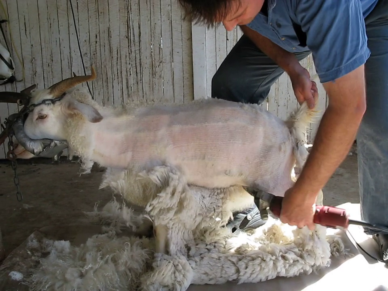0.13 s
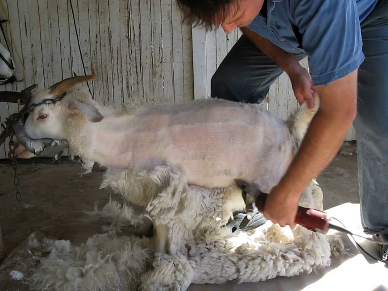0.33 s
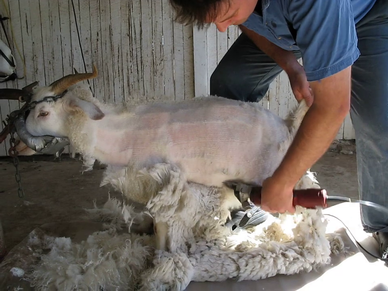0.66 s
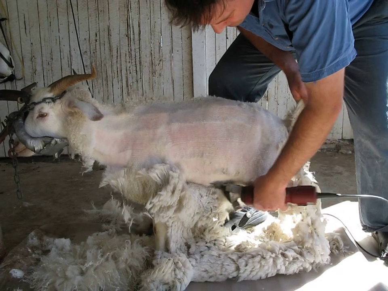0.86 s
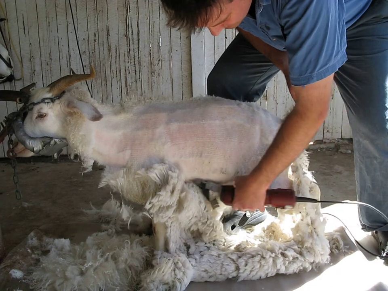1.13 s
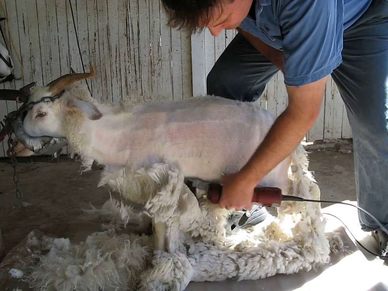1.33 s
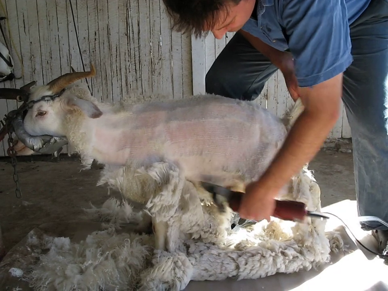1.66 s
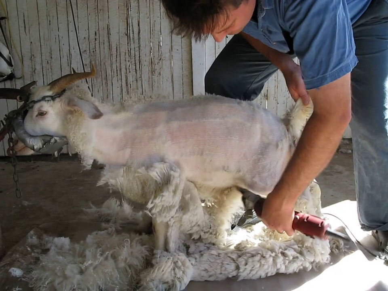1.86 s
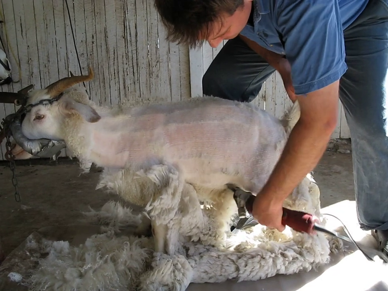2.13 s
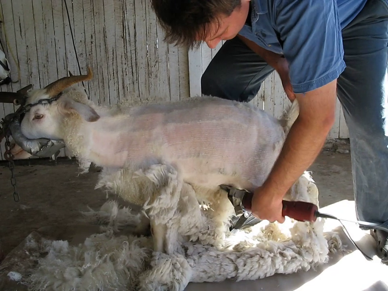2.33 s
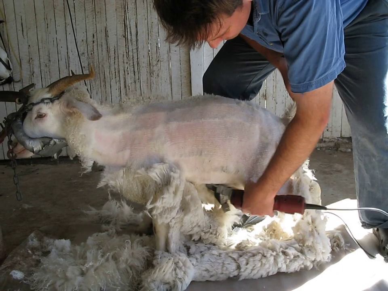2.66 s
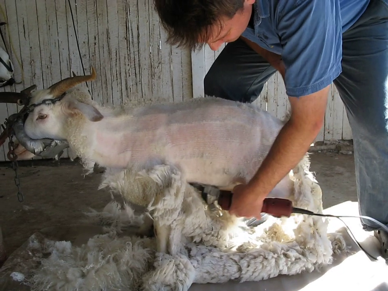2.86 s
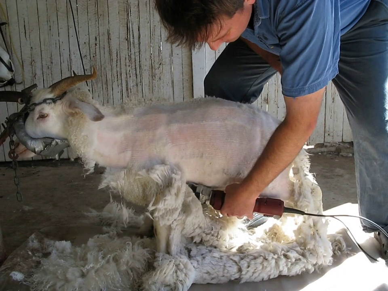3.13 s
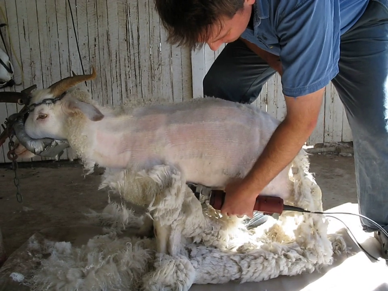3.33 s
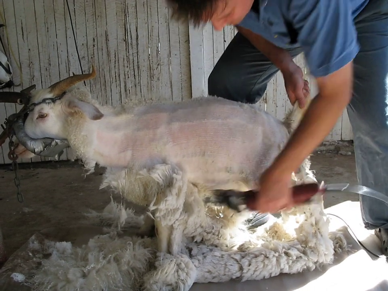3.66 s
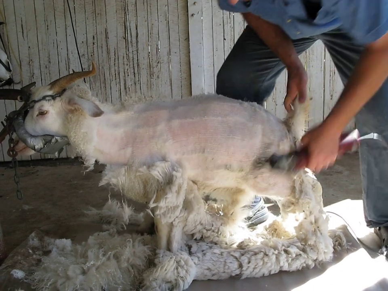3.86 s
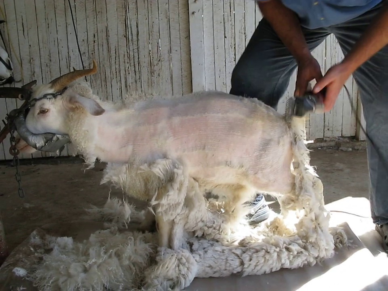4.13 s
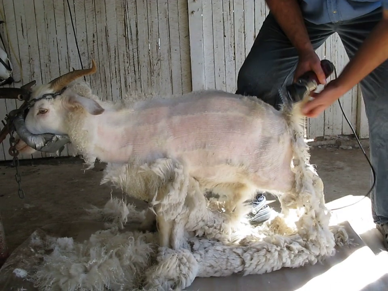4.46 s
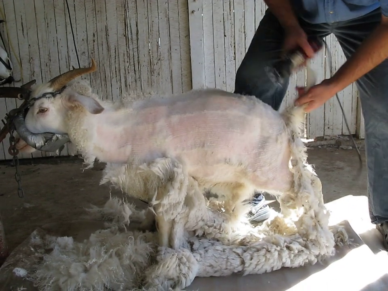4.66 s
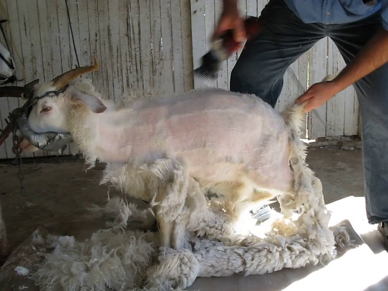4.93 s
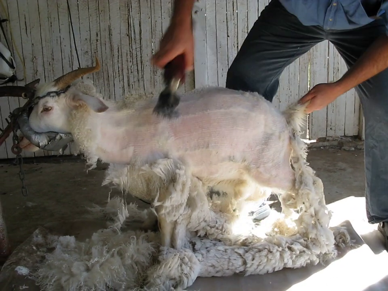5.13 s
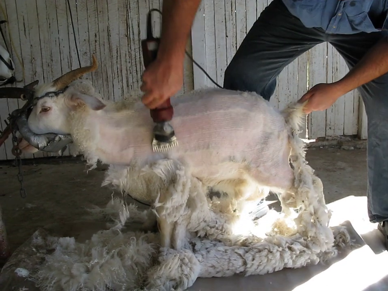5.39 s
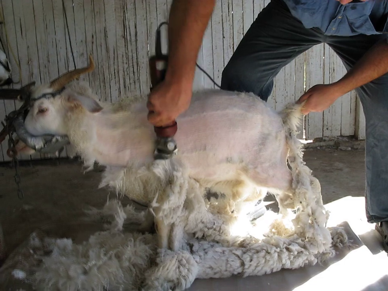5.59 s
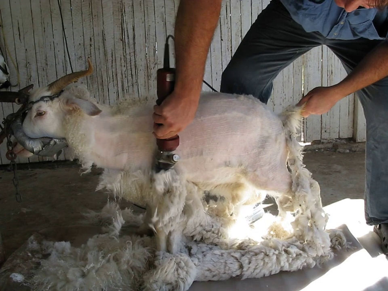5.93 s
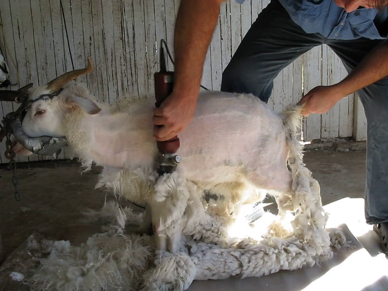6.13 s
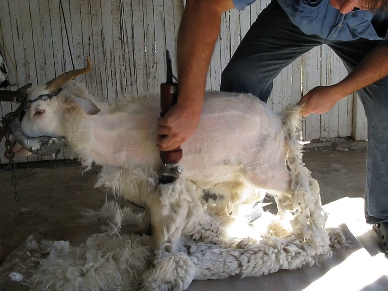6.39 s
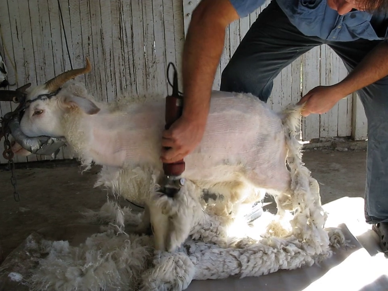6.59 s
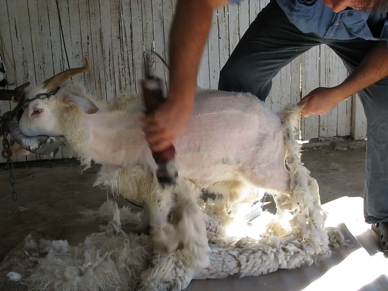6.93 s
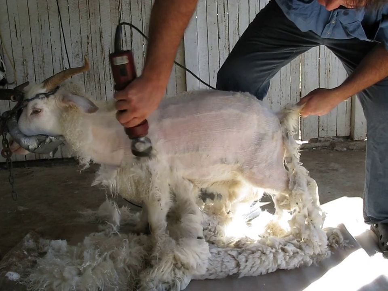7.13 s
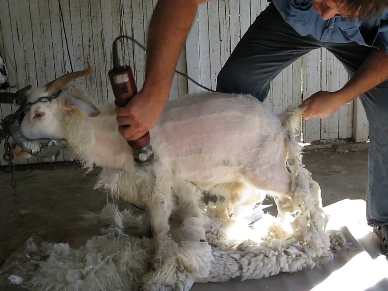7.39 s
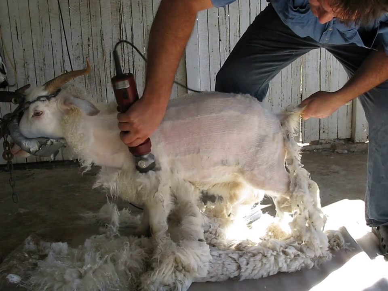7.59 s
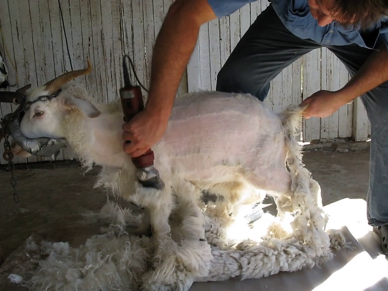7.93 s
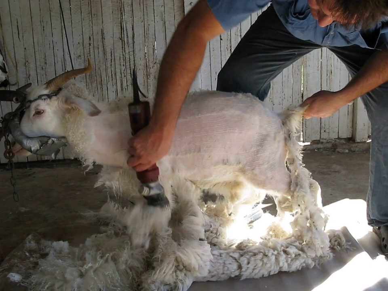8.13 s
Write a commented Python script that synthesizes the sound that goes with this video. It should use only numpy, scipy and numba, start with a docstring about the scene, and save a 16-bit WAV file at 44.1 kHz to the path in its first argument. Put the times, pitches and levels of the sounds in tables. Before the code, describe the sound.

Close, mono buzz of electric clippers cutting a goat's fleece, never stopping. Rapid cutter knocks fuse into a rough rattle under a high gear whine, with dry hair crackle and hissing fan air. The early belly cuts bring ringing colours; a mid-way lift makes it more open, with quick sweeps; later shoulder strokes sound denser and then brighter. Little bass, a slight shed echo, and soft low bumps far underneath.

```python
"""In a wooden shed, an electric shearing handpiece runs without a pause, cutting the fleece of a goat.
A geared motor whines as a sum of tones locked to its crank, over chattering tooth contacts.
The cutter knocks at both ends of every stroke and rebounds in between; hairs crackle and fan air hisses.
Hollows between tool, animal and floor ring as gliding resonances while the hand moves.
Decaying noise echoes stand for the plank walls; filtered noise gives a faint rumble and soft floor bumps."""
import sys
import numpy as np
from scipy import signal
from scipy.fft import rfft, irfft
from scipy.io import wavfile
from scipy.ndimage import uniform_filter1d
from numba import njit

SR = 44100
rng = np.random.default_rng(int(sys.argv[2]) if len(sys.argv) > 2 else 0)


def store_pcm(level_fs):
    """Save levels as 16-bit WAV."""
    pcm = np.round(np.clip(level_fs, -1, 1) * 32767).astype(np.int16)
    wavfile.write(sys.argv[1], SR, np.atleast_2d(pcm).T)


N = 364266


def undb(db):
    """Level law: decibels become an amplitude gain."""
    return 10 ** (np.asarray(db) / 20)


def unit(x):
    """Normalisation: scale to an rms of 1."""
    return x / np.sqrt(np.mean(x ** 2))


def colour(x, points):
    """Zero-phase equalisation: gains in dB interpolated over log frequency."""
    hz, db = np.transpose(points)
    f = np.maximum(np.fft.rfftfreq(N, 1 / SR), 1)
    gain = undb(np.interp(np.log(f), np.log(hz), db))
    return irfft(rfft(x) * gain, N)


def below(x, hz, order=4):
    """Zero-phase low-pass: subtracting it from the input leaves the matching high-pass."""
    sos = signal.butter(order, min(hz, SR / 2 - 1), fs=SR, output="sos")
    return signal.sosfiltfilt(sos, x, padtype="even")


@njit
def resonate(x, hz, width):
    """State-variable resonator: a band-pass with a moving centre and gain 1 at its peak."""
    y, band, low = np.empty(len(x)), 0., 0.
    for i in range(len(x)):
        g = np.tan(np.pi * hz[i] / SR)
        damping = np.pi * width / SR * (g + 1 / g)
        v = (band + g * (x[i] - low)) / (1 + g * (g + damping))
        band, low = 2 * v - band, low + 2 * g * v
        y[i] = damping * v
    return y


def fixed_resonance(x, hz, width_hz):
    """Simple resonance: one mode that holds its pitch."""
    return resonate(x, np.full(N, float(hz)), float(width_hz))


def walk(rate):
    """Random modulation: smoothed random steps, rate per second, scaled to rms 1."""
    k = int(SR / rate)
    steps = np.repeat(rng.standard_normal(N // k + 1), k)
    return unit(uniform_filter1d(steps, k)[:N])


def drift(sounds, rate):
    """Constant-power mixing: blend at random between alike sounds."""
    weights = np.array([walk(rate) for _ in sounds])
    return np.sum(weights * sounds, axis=0) / np.linalg.norm(weights, axis=0)


def fade(x, ms):
    """Exponential decay: each impulse gets a tail with this time constant."""
    return signal.lfilter([1], [1, -np.exp(-1000 / (ms * SR))], x)


def clicks(at, size):
    """Band-limited impulses: short sinc pulses at fractional sample positions."""
    taps = np.floor(at)[:, None] + np.arange(-3, 5)
    inside = (taps >= 0) & (taps < N)
    shape = size[:, None] * np.sinc(taps - at[:, None])
    return np.bincount(taps[inside].astype(int), shape[inside], N)


def ramp(start, length):
    """Linear transition: a straight rise from 0 to 1, times in s."""
    return np.clip((np.arange(N) / SR - start) / length, 0, 1)


def passing_band(x, start, end, first_hz, last_hz, width_hz):
    """Time-windowed resonance: a gliding band of the sound that fades in and out."""
    part, out = slice(max(int(start * SR), 0), int(end * SR)), np.zeros(N)
    n = len(x[part])
    glide_hz = np.linspace(first_hz, last_hz, n)
    out[part] = signal.windows.tukey(n, .4) * resonate(x[part], glide_hz, float(width_hz))
    return out


# spectrum of the still air of the shed, before scaling to the overall level
# columns: frequency_hz, relative_level_db
SHED_AIR = [(20, -1), (40, 5), (80, 3.5), (160, 5.5), (300, 9.5), (500, -49), (1500, -77)]
# soft bumps of feet and animal on the floor
# columns: centre_s, length_s (full width at 1/e), peak_rms_level_db, cutoff_hz
BUMPS = [(0.34, .11, -58, 59.6), (0.624, .1, -61, 55), (0.758, .1, -64, 60), (1.08, .14, -60, 70),
         (1.22, 0.086, -53, 85), (1.42, 0.28, -69, 60), (3.023, .014, -58, 250), (3.1, .14, -62, 55),
         (6.2, .016, -62, 220), (7.075, .012, -52, 600)]


def floor(air_db=-68):
    """Filtered noise: a faint rumble of the shed, and floor bumps with bell-shaped envelopes."""
    t = np.arange(N) / SR
    out = undb(air_db) * unit(colour(rng.standard_normal(N), SHED_AIR))
    for centre, length, db, top_hz in BUMPS:
        envelope = np.exp(-(2 * (t - centre) / length) ** 2)
        thud = unit(below(rng.standard_normal(N), top_hz, order=2))
        out = out + undb(db) * envelope * thud
    return out


def echoes(x, t60, gap_s, rate, count=4):
    """Diffuse reverberation: decaying noise responses, blended as the paths change with the tool."""
    t = np.arange(SR // 3) / SR
    tails = rng.standard_normal((count, len(t))) * undb(-60 * t / t60) * (t > gap_s)
    wet = [signal.fftconvolve(x, tail / np.linalg.norm(tail))[:N] for tail in tails]
    return drift(wet, rate)


def shed(x, near_db=-15.5, far_db=-6):
    """Early and late reflection: arm, flank and floor answer at once, then walls dulled by fleece."""
    near = echoes(x, t60=0.013, gap_s=.0007, rate=4)
    far = echoes(x, t60=0.39, gap_s=.008, rate=5)
    far = colour(far, [(2000, -0.5), (4500, -4.5), (12000, -4.0)])
    return x + undb(near_db) * near + undb(far_db) * far


# pushes through the fleece, and the resonance of the hollow under the comb
# columns: start_s, end_s, pressure (0-1), depth (0-1), first_pitch_hz, last_pitch_hz, width_hz,
# level_db (of the ring before its skirt is taken off)
CUTS = [(-0.3, 0.85, 0.27, 0, 2080, 2040, 200, -15), (0.66, 1.68, 0.4, 0.76, 2580, 2600, 280, 4.6),
        (1.5, 2.6, 0.2, 0, 2050, 2150, 277, -14), (2.278, 3.946, 0.36, 0.75, 2700, 2970, 420, 1.8),
        (5.104, 6.1, 0.2, 0, 1180, 1230, 277, -3), (5.824, 6.934, 0.96, 0, 1790, 1880, 277, 1),
        (7.582, 8.6, 0.6, 0, 6330, 6050, 800, -4)]
PRESS_S, SINK_S, LIFT_S = 0.21, 0.34, 0.17
# the tool, flat under the belly at first, is stood up at the shoulder
TURN_S, TURN_LENGTH_S, UPRIGHT_SHARE = 5.18, 0.4, 0.95


def push(start, end, attack_s):
    """Load envelope of one cut: bear down, hold, lift off."""
    return ramp(start, attack_s) * (1 - ramp(end - LIFT_S, LIFT_S))


def hand():
    """Boundary conditions: how upright the tool stands, its pressure, and its depth in the fleece."""
    upright = UPRIGHT_SHARE * ramp(TURN_S, TURN_LENGTH_S)
    pressure = np.max([hard * push(start, end, PRESS_S) for start, end, hard, *_ in CUTS], axis=0)
    depth = np.max([deep * push(start, end, SINK_S) for start, end, _, deep, *_ in CUTS], axis=0)
    return upright, pressure, depth


# bands weakened by reflections from belly, leg and hand
# columns: start_s, end_s, centre_hz, width_hz, level_db (gain at the centre)
NOTCHES = [(0.0, 1.05, 2340, 150, -5), (2.25, 3.15, 2290, 200, -5), (2.55, 3.1, 4620, 600, -4),
           (4.03, 4.268, 3500, 450, -7), (4.4, 4.718, 3500, 700, -4.5), (6.9, 7.65, 1450, 400, -2.5),
           (7.03, 7.3, 2630, 300, -1)]


def notches(x):
    """Destructive interference: a close reflection weakens one band while the tool stays there."""
    for start, end, hz, width_hz, db in NOTCHES:
        x = x + (undb(db) - 1) * passing_band(x, start, end, hz, hz, width_hz)
    return x


# modes of the animal's flank, excited in proportion to pressure
# columns: pitch_hz, width_hz, level_db (at full pressure)
FLANK = [(596, 93, -1.5), (810, 110, -10), (1310, 200, -2)]
# gliding rings that come and go: quick moves of the tool past the animal, a stronger overtone of the hollow
# while the comb is pressed in the fleece, and a brighter top while the comb faces the listener # columns:
# start_s, end_s, first_pitch_hz, last_pitch_hz, width_hz, level_db
PASSING_RINGS = [(1.17, 1.82, 3600, 3800, 550, -7), (3.62, 3.88, 2900, 2750, 350, -7),
                 (3.79, 4.033, 2150, 1900, 200, -1), (3.8, 4.036, 6900, 6600, 1200, -5),
                 (4.05, 4.68, 4480, 4380, 150, -2.5), (6.42, 6.86, 1920, 1980, 250, -8),
                 (4.35, 4.744, 1850, 2400, 400, -11), (4.0, 5.5, 15100, 14800, 2200, -8),
                 (4.852, 5.122, 9400, 8000, 1500, -12), (5.585, 5.88, 9900, 10300, 700, -12),
                 (6.74, 7.02, 3700, 1950, 400, -2.5), (7.1, 7.7, 9600, 10600, 1800, -9),
                 (8.047, 8.252, 2650, 2500, 500, -5)]
# a hollow draws sound away from the pitches on either side of it
SKIRT_DB, SKIRT_HZ_WIDE = -12, 1100
OVERTONE_RATIO, OVERTONE_HZ_WIDE, OVERTONE_DB = 1.374, 640, -5


def hollows(x, pressure, depth):
    """Cavity resonance: the gap under the comb rings, with a second mode in deep fleece."""
    flank = sum(undb(db) * fixed_resonance(x, hz, width) for hz, width, db in FLANK)
    out = x + pressure * flank
    for start, end, _, _, first_hz, last_hz, width_hz, db in CUTS:
        hz = first_hz + (last_hz - first_hz) * ramp(start, end - start)
        skirt = undb(SKIRT_DB) * resonate(x, hz, float(SKIRT_HZ_WIDE))
        ring = resonate(x, hz, float(width_hz)) - skirt
        overtone = resonate(x, OVERTONE_RATIO * hz, float(OVERTONE_HZ_WIDE))
        ring = ring + undb(OVERTONE_DB) * depth * overtone
        out = out + undb(db) * push(start, end, SINK_S) * ring
    for start, end, first_hz, last_hz, width_hz, db in PASSING_RINGS:
        out = out + undb(db) * passing_band(x, start, end, first_hz, last_hz, width_hz)
    return out


# tones of motor and gears; the levels are rms
# columns: multiple (of the crank rate), free_level_db (running free), light_level_db (light on the
# belly), deep_level_db (deep in the belly fleece), shoulder_level_db (pressed on the shoulder)
TONES = [(4, -83, -76, -75, -81), (5, -80, -76, -75, -77), (10.5, -71, -64, -68, -70),
         (11, -67, -62, -62, -62), (13, -63, -67, -53, -56), (15, -65, -60, -60, -54),
         (16, -60, -69, -68, -52), (18, -68, -58, -66, -65), (18.5, -70, -57, -55, -60),
         (19, -65, -54.5, -52.5, -56), (20, -61, -61, -60, -54), (21, -63, -54.5, -50, -55),
         (22, -70, -66, -58, -61), (22.5, -60, -63, -66, -56), (23, -68, -61, -57, -63),
         (28, -57, -65, -62, -55), (30, -56, -48.5, -53.5, -47.5), (30.5, -56, -58, -56, -55),
         (33, -56, -51, -53, -54), (34, -62, -56, -60, -50), (35, -58, -51, -55, -57),
         (35.5, -63, -55, -51, -60), (38, -53, -58, -55, -57), (43, -52, -49, -47, -51),
         (45.5, -56, -49, -54, -45), (48, -54, -48, -52, -45), (50.5, -49, -44, -49, -46),
         (52.5, -43.5, -36.5, -39.5, -37.5), (54.5, -48, -50, -50, -45), (60.5, -51, -50, -42, -48),
         (62.5, -49, -40.5, -37.5, -46), (64.5, -47, -51, -45, -49), (65.5, -52, -43, -44, -52),
         (66.5, -56, -50, -42.5, -52), (68, -54, -56, -42.5, -47), (78.5, -49, -58, -45, -54),
         (84, -51, -46, -47, -47), (95, -55, -52, -45, -53), (111, -47, -56, -56, -54)]
CONTACT_PRESSURE = 0.15  # even a light touch passes the tones on to the animal


def whine(stroke, upright, pressure, depth, waver_db=1.5, flutter_db=1.3, twist=0.2):
    """Additive synthesis: wavering tones locked to the crank, balanced by contact with the animal."""
    contact = np.tanh(pressure / CONTACT_PRESSURE)
    out = 0
    for multiple, free_db, light_db, deep_db, shoulder_db in TONES:
        # two strokes a turn, so pi per stroke; twist is phase wander in radians
        phase = np.pi * multiple * stroke + twist * walk(30)
        tone = np.sin(phase) * undb(waver_db * walk(3.21) + flutter_db * walk(25))
        belly_db = light_db + depth * (deep_db - light_db)
        touch_db = belly_db * (1 - upright) + shoulder_db * upright
        out = out + undb(free_db + contact * (touch_db - free_db)) * unit(tone)
    return out


def passes(stroke, places, jitter_ms):
    """Cyclic timing: sample positions where the four-stroke cycle passes each place, and which one."""
    marks = np.add.outer(np.arange(0, stroke[-1], 4), places)
    which = np.broadcast_to(np.arange(len(places)), marks.shape).ravel()
    marks = marks.ravel()
    heard = (marks > stroke[0]) & (marks < stroke[-1])
    at = np.interp(marks[heard], stroke, np.arange(N))
    at = at + jitter_ms * SR / 1000 * rng.standard_normal(len(at))
    return at, which[heard]


def fibres(rate=700, spread_db=2.5):
    """Random impulse process: hairs snap between the teeth in a dense, fine crackle."""
    place, chance = rng.random((int(rate * N / SR), 2)).T
    size = undb(-spread_db * np.log(np.maximum(chance, .01)))
    snaps = np.bincount((place * N).astype(int), size, N)
    return unit(fade(snaps, ms=0.28) * rng.standard_normal(N))


def gears(stroke, count=160, scatter=0.22, load_db=5):
    """Periodic impact: tooth contacts repeat every cycle, hardest as a stroke starts, blurred by play."""
    places = rng.uniform(0, 4, count)
    teeth = rng.uniform(-0.7, 1, count) * undb(-load_db * (places % 1))
    at, which = passes(stroke, places, jitter_ms=.035)
    size = teeth[which] * (1 + scatter * rng.standard_normal(len(at)))
    return unit(clicks(at, size))


# knocks over two crank turns, after which the same teeth meet again
# columns: place_strokes, relative_level_db, ring_ms (decay constant of power's square root, before onset smoothing)
KNOCKS = [(0.0, 8.5, 1.9), (0.23, -1, 1.8), (0.46, 2, 3.9), (1.0, 6.5, 4.2), (1.45, 0, 2.2), (1.63, 1, 1.7),
          (1.85, -1, 1.9), (2.0, 8, 2.8), (2.18, 1.5, 1.1), (2.431, 4.5, 2.2), (3.0, 6.5, 4.2),
          (3.43, 0.5, 3.0)]


def cutter(stroke, force_db, scatter_db=3.0, crack_db=1.2, crack_scatter_db=2.5, crack_ms=0.47,
           rise_ms=0.52):
    """Impact noise: the cutter turns with a crack and a metal rattle, then rebounds in mid stroke."""
    power = 0
    for place, db, ring_ms in KNOCKS:
        at, _ = passes(stroke, [place], jitter_ms=.2)
        at = np.clip(at, 0, N - 1).astype(int)
        rattle_chance, crack_chance = rng.uniform(-1, 1, (len(at), 2)).T
        rattle = undb(db + scatter_db * rattle_chance)
        crack = undb(db + crack_db + crack_scatter_db * crack_chance)
        power = power + fade(np.bincount(at, rattle, N), ring_ms) ** 2
        power = power + fade(np.bincount(at, crack, N), crack_ms) ** 2
    # the play in the fork is taken up over a moment, not at once
    power = np.abs(uniform_filter1d(power, max(int(rise_ms * SR / 1000), 1)))
    return unit(np.sqrt(power) * undb(force_db) * rng.standard_normal(N))


# resonances of the casing, added to the direct sound
# columns: pitch_hz, width_hz, level_db
CASING = [(537, 230, -13), (850, 150, -16), (1340, 290, -8), (1720, 50, -4), (1845, 70, -11),
          (10360, 1700, -12.5)]
# radiation of the whole tool, before its bands are levelled
# columns: frequency_hz, relative_level_db
BODY = [(180, -42), (300, -22.5), (385, -27.5), (502, -20), (812, -16.5), (1040, -16.5), (1170, -14),
        (1580, -10.5), (2020, -5.5), (2270, -5), (2680, -2.5), (6240, -3), (11200, -4.5), (15000, -13),
        (15800, -15.5)]
# one row each for motor housing, neck, gear head, and comb and cutter, before hollows and notches
# columns: free_level_db, upright_change_db (per unit upright), pressure_change_db (at full pressure),
# depth_change_db (at full depth)
PARTS = [(-47.9, 1.2, 1.1, 0.5), (-41, -1, 3.4, -0.4), (-24.5, -1.5, 0.76, -1.83),
         (-26.5, 0.15, -0.06, -1.5)]
KNOCK_DEPTH_DB, KNOCK_PRESSURE_DB = 3.5, -0.5


def handpiece(stroke, upright, pressure, depth, bass_db=-9.5, upright_bass_db=-3.5, tug_db=0.48,
              count=4):
    """Source and radiator: knocks, chatter, cut hairs and fan air sound through the casing."""
    force_db = KNOCK_DEPTH_DB * depth + KNOCK_PRESSURE_DB * pressure
    knock = cutter(stroke, force_db)
    knock = colour(knock, [(300, -7.0), (1000, -8), (2500, -2), (6000, -6.5), (14000, -6.5)])
    # a changing load shifts which teeth bear hardest
    teeth = drift([gears(stroke) for _ in range(count)], rate=1.986)
    chatter = colour(teeth, [(300, -10), (1000, -8.0), (2500, -6.0), (6000, -10.5), (14000, -9.0)])
    crackle = colour(fibres(), [(2000, -12.5), (8000, -11), (14000, -6)])
    fan_air = undb(-7.5) * rng.standard_normal(N)
    drive = knock + chatter + crackle + fan_air
    rung = drive + sum(undb(db) * fixed_resonance(drive, hz, width) for hz, width, db in CASING)
    sound = shed(colour(rung, BODY))
    # so small a body radiates little bass, least when it stands clear of the belly
    bass_gain = undb(bass_db + upright_bass_db * upright)
    sound = sound + (bass_gain - 1) * below(sound, hz=370, order=6)
    low, neck = below(sound, hz=960, order=8), below(sound, hz=1655, order=8)
    middle = below(sound, hz=4720)
    bands = (low, neck - low, middle - neck, sound - middle)
    out = 0
    for band, (free_db, upright_db, pressure_db, depth_db) in zip(bands, PARTS):
        db = free_db + upright_db * upright + pressure_db * pressure + depth_db * depth
        # the running rms over a quarter second holds each band at its level
        out = out + band / np.sqrt(uniform_filter1d(band ** 2, SR // 4)) * undb(db)
    # locks of uneven thickness tug at the cutter
    return notches(hollows(out, pressure, depth)) * undb(tug_db * walk(14))


# speed of the drive, sagging under load
# columns: time_s, crank_rate_hz (turns per second)
CRANK = [(0.0, 39.591), (0.61, 39.779), (1.53, 39.356), (1.84, 39.588), (2.14, 39.641), (3.06, 39.408),
         (3.67, 39.532), (3.98, 39.494), (4.89, 39.742), (5.51, 39.581), (6.73, 39.118), (7.04, 39.453),
         (8.26, 39.194)]


def crank_strokes():
    """Phase accumulation: the crank rate summed over time, at two strokes a turn."""
    s, rate_hz = np.transpose(CRANK)
    crank_hz = np.interp(np.arange(N) / SR, s, rate_hz)
    return .56 + 2 * np.cumsum(crank_hz) / SR


def scene():
    """Superposition: one crank times every part of the tool; the hand sets its load and colour."""
    stroke = crank_strokes()
    upright, pressure, depth = hand()
    tool = handpiece(stroke, upright, pressure, depth)
    tones = whine(stroke, upright, pressure, depth)
    return (tool + tones + floor())[None]


def record(dry):
    """Band limiting: a steep elliptic low-pass cuts the top of the treble."""
    top_hz = 15800
    return signal.sosfilt(signal.ellip(10, .2, 80, top_hz, fs=SR, output="sos"), dry)


dry = scene()
out = record(dry)
store_pcm(out)
```